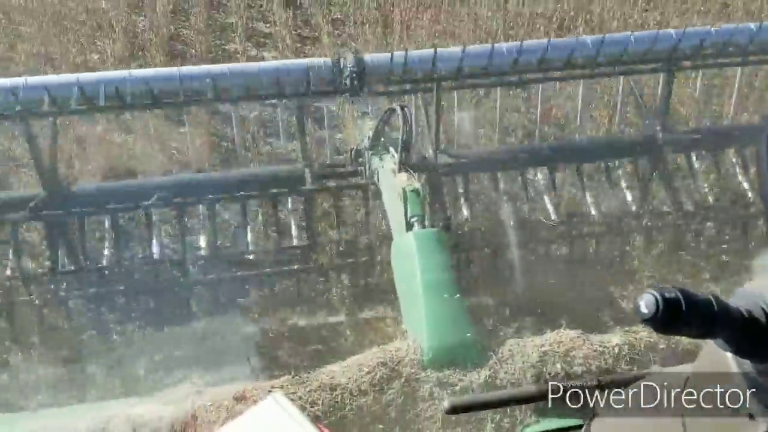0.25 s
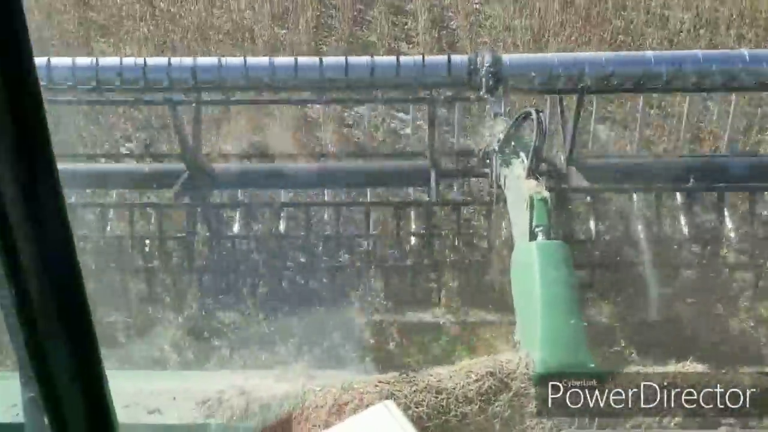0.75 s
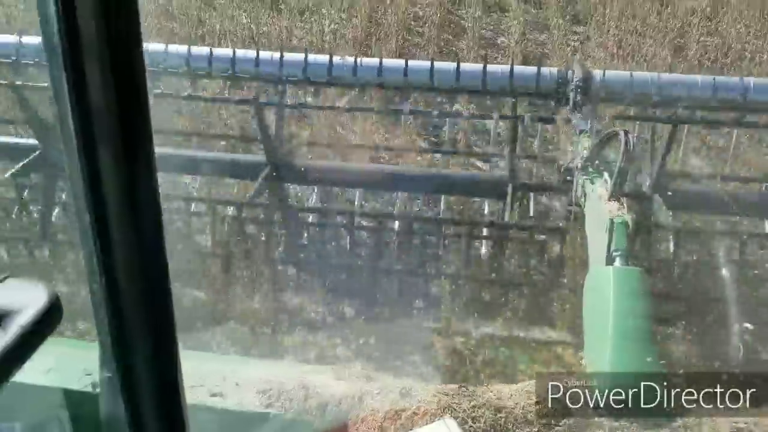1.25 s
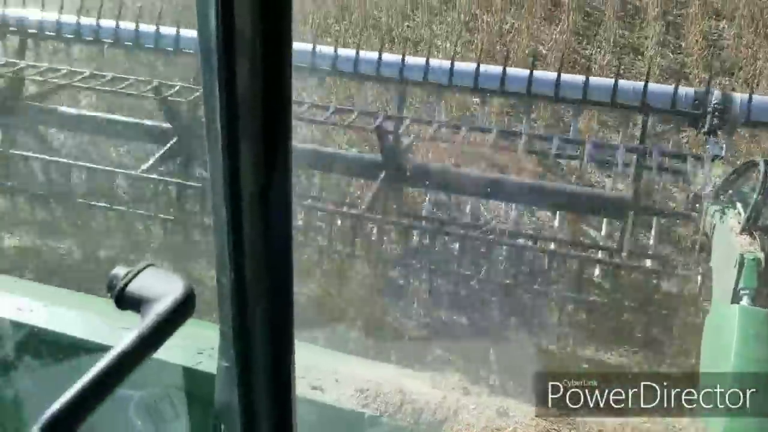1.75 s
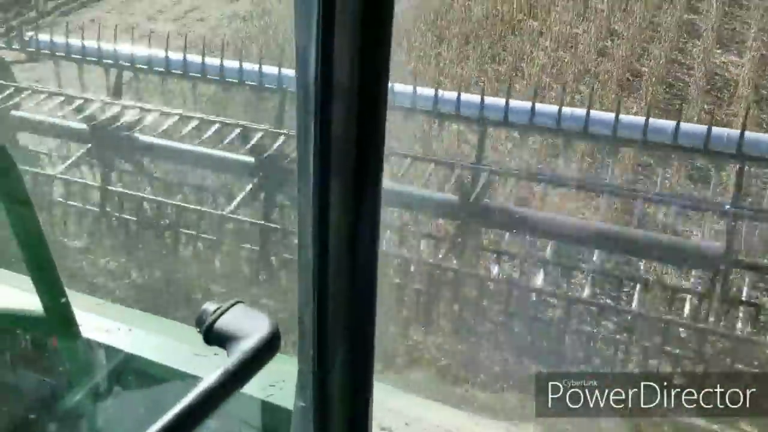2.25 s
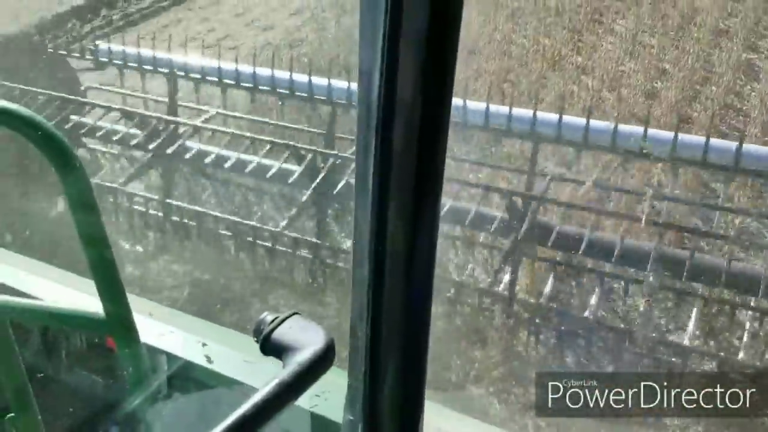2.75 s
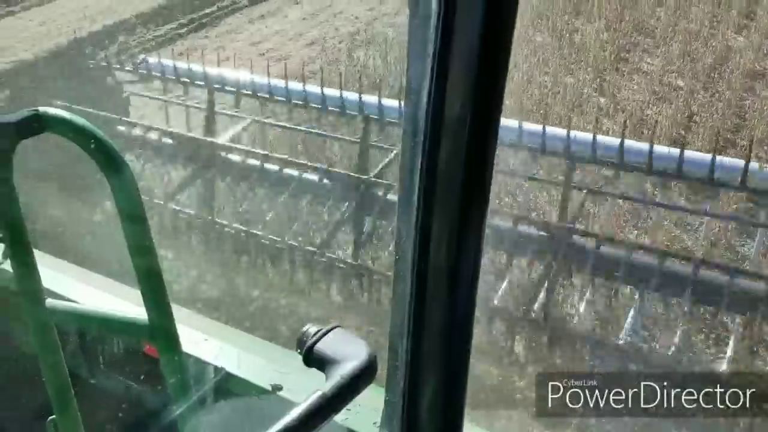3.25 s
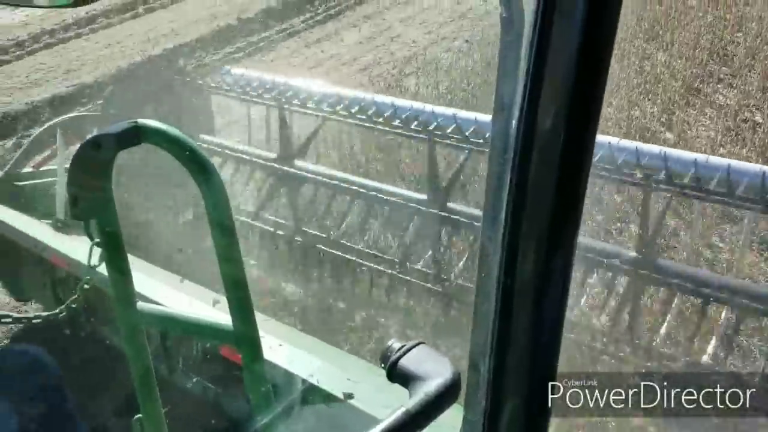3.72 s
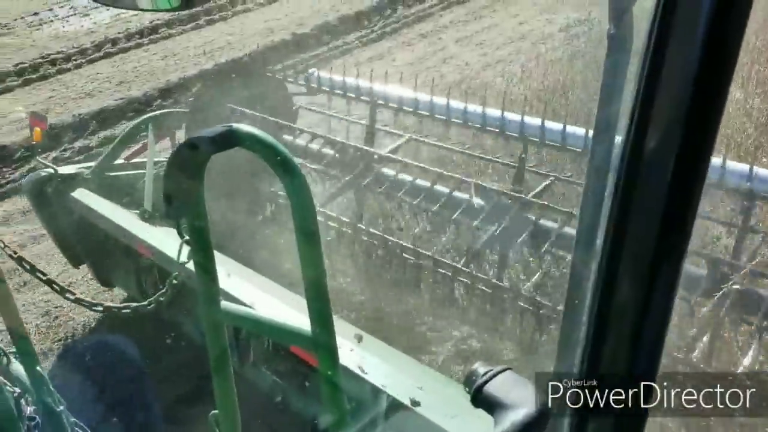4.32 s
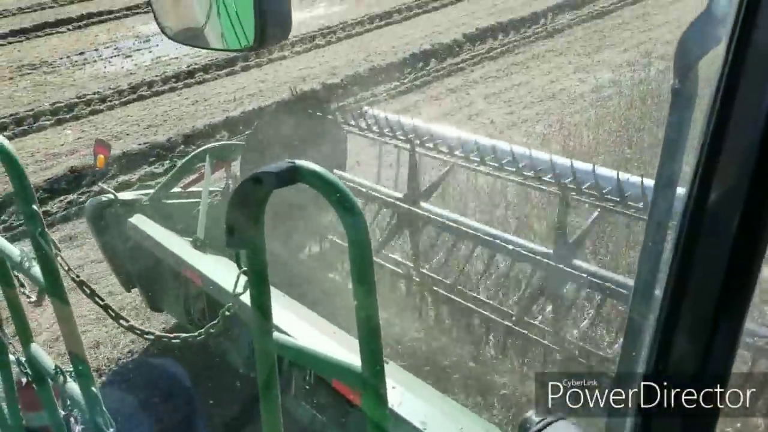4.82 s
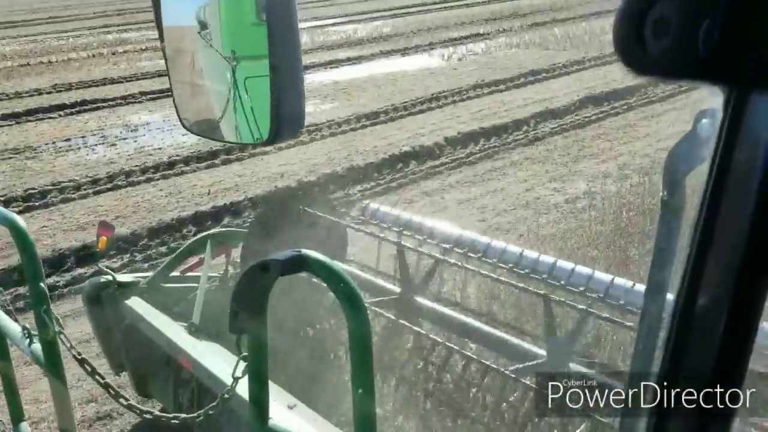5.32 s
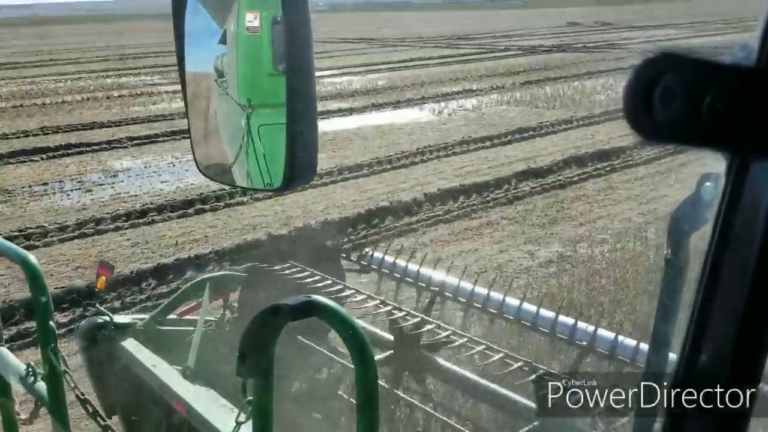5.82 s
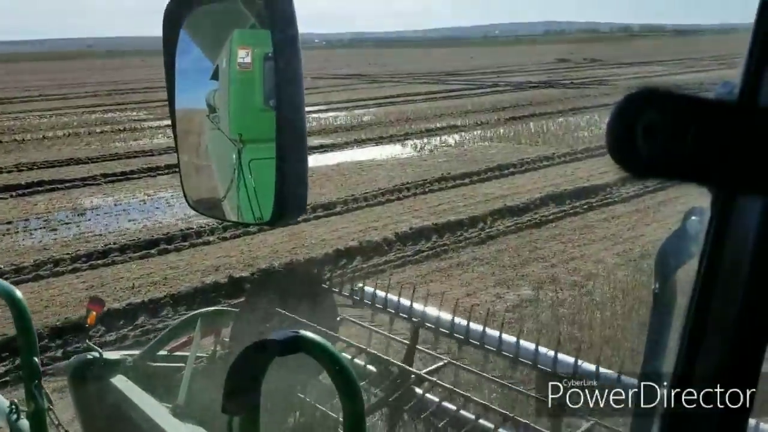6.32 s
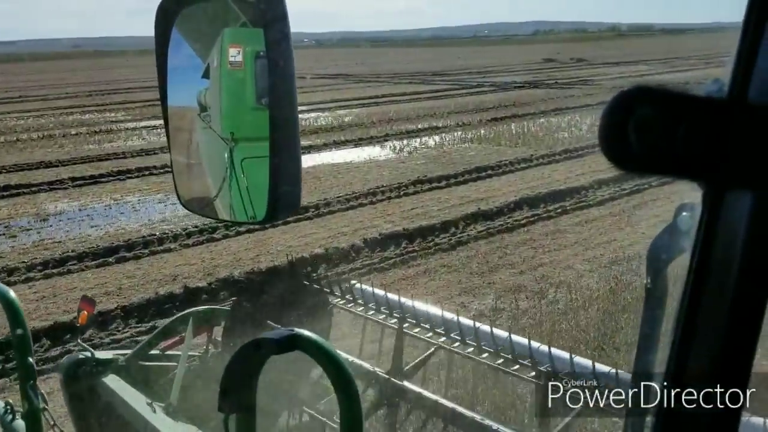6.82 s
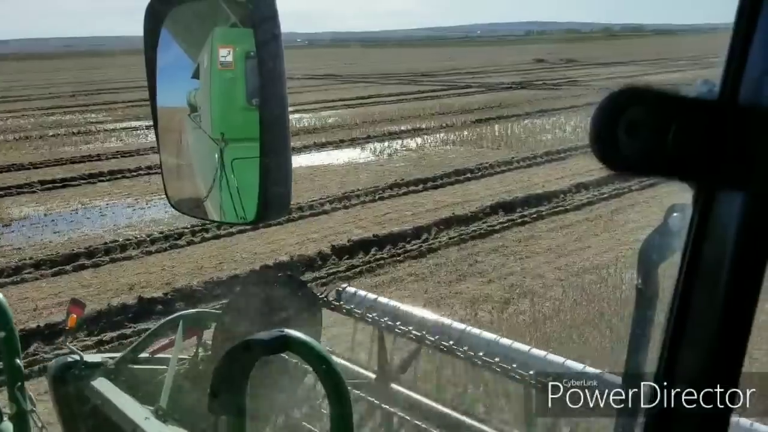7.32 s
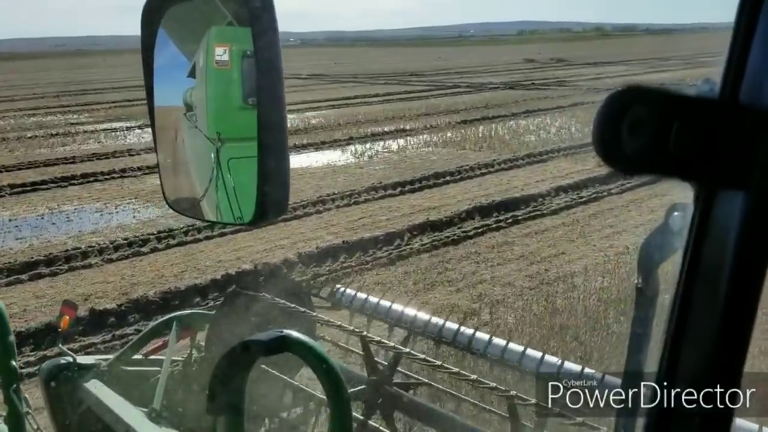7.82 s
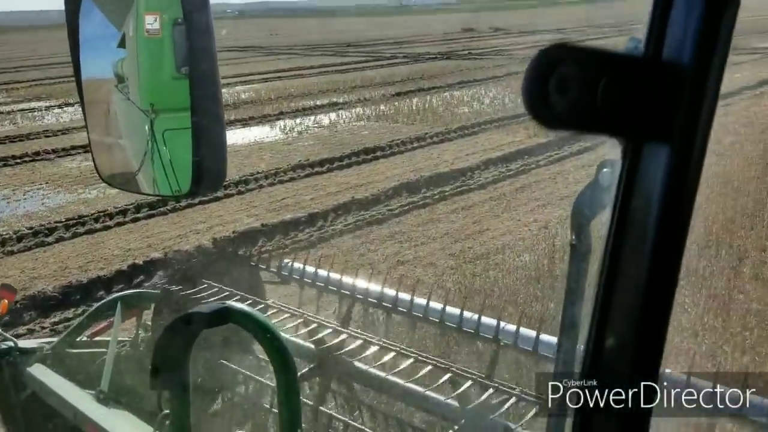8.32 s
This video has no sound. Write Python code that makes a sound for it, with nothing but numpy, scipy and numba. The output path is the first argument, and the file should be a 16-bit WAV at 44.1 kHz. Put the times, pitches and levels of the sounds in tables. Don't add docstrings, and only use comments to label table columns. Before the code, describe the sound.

Inside a combine harvester cab in a dry field, a dense low roar runs without pause, hull booming and shafts humming. Lumps of crop thud irregularly through the drums while sheet metal rings and loose parts knock lightly. A pod snaps early on and a dry bearing squeaks faintly. The handheld phone turns from windscreen to side door, the upper rumble growing and the panel ringing easing, with soft wind buffeting.

```python
import sys
import numpy as np
from scipy import signal
from scipy.fft import rfft, irfft, next_fast_len
from scipy.io import wavfile
from scipy.ndimage import uniform_filter1d, map_coordinates
from numba import njit

SR = 44100
rng = np.random.default_rng(int(sys.argv[2]) if len(sys.argv) > 2 else 0)


def dump(signal):
    limited = np.clip(np.atleast_2d(signal).T, -1, 1)
    pcm = np.round(limited * 32767).astype(np.int16)
    wavfile.write(sys.argv[1], SR, pcm)


def invert_db(x):
    u = np.asarray(x, float) / 20
    return 10 ** u


N = 377496

# time in seconds, angle to the left in degrees.
PHONE_TURN = [
    (0, -19),
    (.6, -8.5),
    (1.5, 17),
    (3, 38.5),
    (4.5, 56.5),
    (5.5, 72),
    (6.2, 74),
    (7.6, 78),
    (8.56, 63),
]
# start and end in seconds, left and right bass cut in Hz, level dip in dB.
GUSTS = [(0, 0.048, 136, 61, 1.8), (0.47, 0.606, 167, 50, -1), (0.615, 0.752, 188, 40, 0),
         (0.848, 0.913, 130, 59.5, -0.3), (1.218, 1.26, 150, 29.8, 0.5), (2.098, 2.13, 90, 91.4, 1),
         (2.87, 2.94, 128, 81.6, 0.1), (5.533, 5.665, 285, 77, 2), (5.75, 5.879, 184, 40, 3),
         (6.028, 6.265, 195, 69.6, 2), (6.306, 6.462, 146, 40, 2.5), (6.853, 6.94, 240, 50, 1.5),
         (7.129, 7.193, 240, 160, 2), (7.29, 7.395, 172, 40, 1), (7.499, 7.553, 201, 60, 2),
         (7.84, 7.865, 120, 30, -11), (8.036, 8.066, 140, 50, 1.2), (8.17, 8.206, 130, 30, 1.6),
         (8.29, 8.323, 130, 40, 1.5)]
# time in seconds, level in dB.
DRAUGHT_LEVEL = [(0.0, -25), (0.21, -35), (.6, -33), (1.3, -38), (2.1, -30.5), (2.8, -42), (3.41, -32),
                 (4.17, -34), (4.69, -36.5), (5.03, -36.5), (5.68, -31.5), (5.82, -32), (5.91, -27),
                 (6.03, -34), (7.2, -33), (7.32, -34), (8.56, -29.5)]
# frequency in Hz, level in dB per Hz.
DRAUGHT_COLOUR = [(14, -24), (25, -23), (42, -7.5), (55, -14), (90, -14)]

# frequency in Hz, likeness from 0 to 1.
PORT_LIKENESS = [(30, .55), (90, .9), (200, .97), (330, .72), (600, .7), (950, .86), (1400, .5), (2100, .8),
                 (4000, .42), (8000, .2), (14000, .33)]
# frequency in Hz, left minus right in dB.
PORT_BALANCE = [(30, 3), (90, .3), (220, .4), (310, 3.8), (450, -.2), (930, -1.5), (1300, .8), (2200, 1.5),
                (5000, .6), (12000, -1.3)]
# extra path in milliseconds, level in dB.
REFLECTIONS = [(2.3, -14), (3.9, -13), (6.1, -12), (9.7, -11), (14.3, -11)]
FACING = {"deep": (-28, 22, 1), "upper": (-26.5, 81, 2.2), "frame": (-34.5, 29, 0.94),
          "chaff": (-52, 52, 0.43), "dust": (-60, 39, 0.73), "panels": [(-39.5, 10, 3.5), (-42, 33, 26),
          (-47.5, 5, 12), (-52, 17, 1), (-47.5, 43, 15)]}

# frequency in Hz, level in dB per Hz.
SNAP_COLOUR = [(1000, 3), (2000, 7), (2700, 1), (3950, -2.5), (6490, -5), (8880, -11), (12300, -1),
               (15000, -5)]
# pitch in Hz, then bursts of start and length in seconds, level in dB.
SQUEALS = [
    (4450, [(.72, 0.041, -63), (.92, 0.064, -66)]),
    (4600, [(.53, .03, -60), (1.45, .06, -67), (2.4, 0.073, -73), (3.05, 0.079, -66), (3.4, .04, -63), (7.1, .04, -64)]),
]
# time in seconds, peak level in dB, ring in Hz.
KNOCKS = [(0.039, -20.5, 953), (0.125, -24, 950), (0.462, -23.5, 937), (0.835, -20, 960), (0.9, -24, 850),
          (1.173, -22, 920), (1.908, -18, 926), (2.08, -20.5, 880), (2.231, -25, 990), (2.436, -21, 953),
          (3.144, -21, 950), (3.385, -22, 954), (4.311, -22, 955), (5.996, -19.5, 950), (7.223, -28, 969),
          (7.78, -22, 840)]
# time in seconds, peak level in dB, ring in Hz.
TICKS = [(0.1196, -35, 2040), (0.599, -31, 1870), (1.8078, -36, 2010), (1.9475, -31, 1800),
         (2.1405, -33, 1850), (4.9352, -39, 2170), (5.3308, -27, 2090), (5.5159, -35, 2120),
         (6.137, -28, 1880), (7.0688, -35, 2060), (7.1442, -37, 1910), (7.5038, -42, 2250),
         (8.0496, -27, 1850), (8.2666, -28, 1990), (0.4115, -34, 1750), (0.6469, -43, 1990),
         (0.8714, -30, 2010), (0.9009, -36, 2060), (1.4491, -32, 2060), (1.6262, -36, 2190),
         (3.7718, -36, 1770), (4.9801, -33, 2380), (5.1986, -24, 2100), (5.2894, -35, 2110),
         (5.5528, -40, 2080), (7.7134, -37, 2240), (7.7742, -34, 2050), (7.9289, -31, 2160),
         (8.0072, -37, 2090)]
# time in seconds, peak level in dB, ring in Hz.
FLECKS = [
    (1.296, -46, 4700),
    (1.315, -44, 4800),
    (1.338, -46, 2900),
    (4.714, -45, 4500),
]

# frequency in Hz, level in dB per Hz.
DUST_COLOUR = [(7800, -11), (8700, -11.5), (10000, -6.5), (12300, -0.5), (14000, -3.5), (15100, -6)]
# frequency in Hz, level in dB per Hz.
CHAFF_COLOUR = [(1000, -36), (1400, -12), (2400, -10), (3100, -8), (4300, -7), (5200, -8.5), (6800, -16),
                (7600, -23), (8500, -56), (9500, -47)]
# frequency in Hz, width in Hz, lift in dB.
CHAFF_MODES = [(2800, 220, -6.5), (3570, 610, 5), (4500, 160, 4), (6380, 760, 4)]
# time and length in seconds, chaff lift and tine lift in dB.
SWATH = [(.3, 0.27, 2.3, 3), (1.3, 0.094, 1.5, 1.5), (2.15, .2, 0, 1), (3.4, 0.41, -3.9, -5.5),
         (5.3, .2, 1, 0.5), (5.58, 0.034, 1.5, 0), (6.15, 0.15, -1.5, -3.5), (8.1, 0.36, 0, -0.5),
         (3.5, 0.28, 2, 5.5), (4.88, 0.064, 0, 2), (5.9, 0.043, 1, 2), (7.1, 0.12, -2, 0.5),
         (.05, .08, -2, -1), (.45, .1, -1.5, -2), (.73, .1, -0.5, 1), (1.05, .1, -0.5, 0)]
# frequency in Hz, width in Hz, level in dB.
PANEL_MODES = [
    [(946, 72, 0), (995, 50, -14)],
    [(852, 64, 0)],
    [(1070, 85, 0), (1190, 80, -8), (1310, 120, -21)],
    [(1540, 160, -12), (1790, 230, 0), (1970, 200, 0), (2900, 260, -9)],
    [(2085, 200, 1), (2270, 170, -5.5), (2420, 200, -7), (2620, 260, -10)],
]
# time and length in seconds, frame lift and panel lift in dB.
JOLTS = [(.15, 0.13, 1.5, 0.5), (.55, 0.082, 1.5, 1.5), (1.0, 0.24, 2, -0.5), (1.25, 0.04, -0.5, -1.5),
         (1.5, 0.057, -1, 0), (2.0, 0.13, 1, 0), (2.3, 0.016, -3, -6), (2.93, 0.1, -0.5, -3.5),
         (3.15, 0.18, 1, 0.5), (3.8, 0.31, 0, -0.5), (4.4, 0.17, 0, -1.5), (4.65, 0.079, 1.5, -1.5),
         (5.6, 0.043, 1, 0.5), (5.85, 0.11, 1.5, 5.5), (6.1, 0.023, -8, -7), (6.35, 0.3, 2.5, 1.5),
         (6.85, .15, -0.5, 1), (7.25, 0.061, -0.5, 2), (7.7, 0.07, 0.5, 3), (8.4, .12, 1.5, -0.5)]
# frequency in Hz, level in dB per Hz.
FRAME_COLOUR = [(250, -0.5), (280, 3.5), (400, 2.5), (480, -0.5), (530, -5), (700, -8.5), (770, -19),
                (900, -26), (1300, -26.5), (1700, -19)]
# frequency in Hz, width in Hz, lift in dB.
FRAME_MODES = [(355, 40, 3), (575, 30, 3), (683, 30, 5)]

SHAFT_HZ = [68, 92, 97.5, 126, 132, 157.6, 255.6, 356, 426.5, 443, 491, 571.5, 1904]
# level in dB, speed wander in percent, left minus right in dB.
SHAFT_LEVELS = [(-41, .15, -2), (-39, 1.2, 0), (-41, .5, -.5), (-39, .6, 0), (-39, .6, 0), (-39, .2, -1.5),
                (-39.5, .3, 2), (-50, .3, -1), (-50, .12, -2), (-52, .06, -2), (-54, .1, -2),
                (-51, .22, -3), (-61, .1, 1)]
# frequency in Hz, level in dB per Hz.
HULL_COLOUR = [(40, -28), (52, -12), (68, 2.5), (110, -6), (180, -8), (255, -6), (285, -53)]
# frequency in Hz, width in Hz, lift in dB.
HULL_MODES = [(92.5, 10.7, 11.5), (130, 77, 10), (195, 5.1, 7.5), (240, 14, -4.5)]
# time and length in seconds, lift in dB.
SIEVE = [(.12, .05, 6), (.24, .04, -1), (.55, 0.041, 4.5), (.77, 0.096, 8.5), (1.3, 0.17, 3.5),
         (1.43, .02, -12), (1.48, .025, 4.5), (1.66, .05, 13), (1.86, 0.055, -10), (2.26, 0.043, -5),
         (2.57, 0.033, 4), (2.72, 0.061, -1.5), (2.94, 0.046, -2), (3.4, 0.059, -8), (3.6, 0.11, 7.5),
         (4.14, .05, 1), (4.6, 0.066, -2), (5.2, 0.12, 3.5), (5.5, 0.087, 6), (5.6, 0.027, -13),
         (5.7, .05, 0), (6.7, 0.063, 6), (6.87, 0.045, -4), (7.26, 0.046, 0), (8.1, 0.077, -11)]
# time and length in seconds, deep boom lift and upper rumble lift in dB.
WADS = [(0.298, 0.075, 8.5, 0.5), (0.354, 0.027, -1, 6.5), (0.655, 0.025, 6, -6), (0.946, 0.015, 14, 1),
        (1.35, 0.089, 10.5, 1.5), (1.624, 0.029, -19, -5), (1.776, 0.031, -11, 2.5), (1.89, 0.035, 9.5, 3),
        (2.127, 0.051, -16, 4.5), (2.225, 0.079, 2, 5), (2.36, 0.049, -7, 4.5), (2.58, 0.034, 6, 2),
        (2.653, 0.029, -7, -1), (2.78, 0.088, 4, 5), (2.92, 0.026, -9, -2), (3.074, 0.049, 11.5, -1),
        (3.304, 0.065, 7.5, 2.5), (3.44, 0.036, -3, 9), (3.634, 0.043, 3, -8), (3.741, 0.034, 5, 6.5),
        (4.33, 0.044, -13, 4), (4.544, 0.027, 9, 4), (4.63, 0.044, -10, 4), (5.145, 0.27, 3.5, 1.5),
        (5.39, 0.024, 9.5, 2.5), (5.91, 0.072, 4, 0.5), (6.48, 0.053, 9, 4), (7.103, 0.082, 8, 4),
        (7.17, 0.017, -14, -21), (8.093, 0.024, -14, 9.5), (0.052, 0.046, -1, -3), (0.436, 0.035, -1, 1),
        (1.05, 0.084, -3, -4.5), (1.495, 0.032, 2, 2), (2.065, 0.026, -4, -2), (3.0, .05, 1.5, 3),
        (3.903, 0.068, 0, 1.5), (4.13, 0.089, 4, -2), (4.253, 0.027, -4, 4.5), (4.75, 0.046, 1, 2),
        (5.59, 0.033, 12.5, 0.5), (5.7, 0.044, 3.5, 3.5), (5.828, 0.033, -1, 6.5), (6.058, 0.044, 4, 3.5),
        (6.327, 0.027, -2, 0), (6.885, 0.047, 9, 0), (7.254, 0.079, -5, 4), (7.597, 0.049, -16, -1.5),
        (7.97, 0.081, -20, 0), (8.397, 0.073, 3, 0.5)]
# time in seconds, lift in dB.
THUDS = [(0.36, -1), (0.588, 2), (0.669, 9), (0.836, 5), (0.958, 4.6), (1.131, 4), (1.371, 0), (1.478, 6),
         (1.696, 3), (1.78, 7.5), (1.895, 3), (1.931, 7), (2.221, 7.5), (2.257, 10), (2.593, 6), (2.703, 9),
         (2.783, 2), (2.859, 4.5), (3.085, 3.5), (3.412, 6), (3.743, 1), (3.983, 7), (4.054, 10.5),
         (4.108, 10), (4.169, 6), (4.341, 9), (4.394, 6), (4.424, 3.6), (4.536, 8), (4.658, 7), (4.71, 7),
         (4.806, 6), (4.84, 6), (5.154, 6.5), (5.222, 4), (5.359, 7.5), (5.688, 6.5), (5.723, -3),
         (5.893, 6), (5.94, 3), (6.006, 3), (6.129, 3), (6.335, 9), (6.496, 7), (6.6, 9), (6.791, 1.5),
         (7.067, 4.4), (7.205, 5), (7.238, 8), (7.42, -3), (7.489, 6), (7.611, 9), (7.794, 7), (7.901, 6),
         (8.017, 7), (8.092, 4), (8.156, 6), (8.241, 6.5), (8.272, 5.3), (8.465, 5.3)]

PORT_LAG = 17.97
GUARD_EDGE_S, GUARD_RELEASE_S, GUARD_LINGER_S = 0.0096, 0.38, 0.39
FADE_IN_S = 0.012
TOP_HZ, TOP_ORDER = 15550, 90
SNAP_S, SNAP_DB, SNAP_T60_S = .593, -30.5, .045
SNAP_TAIL_DB, SNAP_TAIL_T60_S = -17, 0.11
SQUEAL_WIDTH_HZ = 43
KNOCK_RISE_S, KNOCK_CYCLES, KNOCK_TRIM_DB = .0008, 42, -1.5
HUSH_S, HUSH_DB = .012, -5
THROB_DB, THROB_PER_S = 2.9, 26
THUD_S, THUD_STEADY = 0.0048, 0.29
SHAKE = 0.55

T = np.arange(N) / SR
SIZE = next_fast_len(N)
HZ = np.maximum(np.fft.rfftfreq(SIZE, 1 / SR), 1)


def unit(x):
    return x / np.sqrt(np.mean(x ** 2))


def over_time(table):
    s, value = np.transpose(table)
    return np.interp(T, s, value)


def over_hz(points):
    hz, value = np.transpose(points)
    return np.interp(np.log(HZ), np.log(hz), value)


def closed(points, slope_db):
    octaves_below = np.maximum(np.log2(points[0][0] / HZ), 0)
    octaves_above = np.maximum(np.log2(HZ / points[-1][0]), 0)
    return invert_db(over_hz(points) - slope_db * (octaves_below + octaves_above))


def bell(hz, width_hz):
    return 1 / (1 + (2 * (HZ - hz) / width_hz) ** 2)


def lifted(points, modes, slope_db):
    lift_db = sum(db * bell(hz, width) for hz, width, db in modes)
    return closed(points, slope_db) * invert_db(lift_db)


def shape(x, gain):
    return irfft(rfft(x, SIZE) * gain, SIZE)[..., :N]


def walk(rate):
    hold = int(SR / rate)
    steps = np.repeat(rng.standard_normal(N // hold + 1), hold)
    smooth = uniform_filter1d(uniform_filter1d(steps, hold), hold)
    return unit(smooth[:N])


def delayed(x, samples):
    return map_coordinates(x, [np.arange(N) - samples], order=3, mode="nearest")


def port_lag():
    return PORT_LAG * np.sin(np.radians(over_time(PHONE_TURN)))


def facing_db(level_db, toward_deg, loss_db):
    off_axis = np.radians(over_time(PHONE_TURN) - toward_deg)
    return level_db - loss_db * (1 - np.cos(off_axis))


def swells(table):
    lift = np.zeros((len(table[0]) - 2, N))
    for s, length, *lift_db in table:
        near = slice(max(int((s - 3 * length) * SR), 0), int((s + 3 * length) * SR))
        lift[:, near] += np.outer(lift_db, np.exp(-((T[near] - s) / length) ** 2))
    return lift


def thuds():
    return swells([(s, THUD_S, db) for s, db in THUDS])[0]


def load():
    gaps = np.clip(walk(THROB_PER_S), 0, 1.6) ** 2
    return np.outer([1, .9], -THROB_DB * gaps) + swells(WADS)


def hush(events):
    return swells([(s - HUSH_S / 2, HUSH_S, HUSH_DB) for s, *_ in events])[0]


def steadied(x, length, even):
    swell = uniform_filter1d(np.mean(x ** 2, axis=0), size=length)
    return unit(x / (swell + .05) ** (even / 2))


def draught():
    eddies = 0.6 * rng.standard_normal(N) + 0.8 * rng.standard_normal((2, N))
    level_db = over_time(DRAUGHT_LEVEL) + 5.0 + 1.6 * walk(6.1) + SHAKE * thuds()
    return unit(shape(eddies, closed(DRAUGHT_COLOUR, 8.7))) * invert_db(level_db)


def roar():
    likeness = np.clip(over_hz(PORT_LIKENESS), 0, 1)
    source = rng.standard_normal(N)
    lag = port_lag()
    middle = np.array([delayed(source, 0.5 * lag), source])
    treble = np.array([delayed(source, lag), source])
    for ms, db in REFLECTIONS:
        path = ms * SR / 1000 * (1 + 0.0304 * walk(.8))
        left = delayed(source, path + lag)
        right = delayed(source, path + 6 * walk(0.462))
        treble = treble + invert_db(db) * np.array([left, right])
    high = 1 / (1 + (1300 / HZ) ** 8)
    low = 1 / (1 + (HZ / 300) ** 4)
    direct = shape(source, low) + shape(middle, 1 - low - high) + shape(unit(treble), high)
    own = rng.standard_normal((2, N))
    both = shape(direct, np.sqrt(likeness)) + shape(own, np.sqrt(1 - likeness))
    return shape(both, invert_db(np.outer([.5, -.5], over_hz(PORT_BALANCE))))


def snap():
    since = np.maximum(T - SNAP_S, 0)
    tearing = invert_db(-60 * np.maximum(since - .006, 0) / SNAP_T60_S)
    rustle = invert_db(SNAP_TAIL_DB - 60 * since / SNAP_TAIL_T60_S)
    burst = (1 - np.exp(-since / 0.0003)) * (tearing + rustle)
    crack = 0.59 * rng.standard_normal(N) + 2.0 * rng.standard_normal((2, N))
    return unit(shape(crack, closed(SNAP_COLOUR, 30))) * burst * invert_db(SNAP_DB)


def squeals(air):
    out = 0
    for hz, bursts in SQUEALS:
        whistle = unit(shape(air, bell(hz, SQUEAL_WIDTH_HZ)))
        level = sum(invert_db(db) * np.exp(-((T - s) / length) ** 2) for s, length, db in bursts)
        out = out + whistle * level
    return out


def knocks():
    ring = np.zeros(N)
    for s, db, hz in [*KNOCKS, *TICKS, *FLECKS]:
        start = int(s * SR)
        since = np.maximum(T[start:int((s + .12) * SR)] - s, 0)
        decay = invert_db(db + KNOCK_TRIM_DB - 60 * since * hz / KNOCK_CYCLES)
        rise = 1 - np.exp(-since / KNOCK_RISE_S)
        ring[start:start + len(since)] += decay * rise * np.sin(2 * np.pi * hz * since)
    return np.array([delayed(ring, 0.29 * port_lag()), ring])


def chaff(air, chaff_db, dust_db):
    puffs_db = 0.34 * walk(15) + 0.85 * walk(30)
    coarse = unit(shape(air, lifted(CHAFF_COLOUR, CHAFF_MODES, 30))) * invert_db(chaff_db + puffs_db)
    flicker_db = 0.57 * walk(12) + 0.17 * puffs_db
    return coarse + unit(shape(air, closed(DUST_COLOUR, 30))) * invert_db(dust_db + flicker_db)


def panels(air, panel_jolt_db, tine_db):
    out = 0
    for i, (modes, facing) in enumerate(zip(PANEL_MODES, FACING["panels"])):
        if i < 3:
            change_db = panel_jolt_db + hush(KNOCKS) - .4
        else:
            change_db = tine_db + 0.13 * hush(TICKS)
        ring = unit(shape(air, sum(invert_db(db) * bell(hz, width) for hz, width, db in modes)))
        flutter_db = 0.9 * walk(20) + 1.9 * walk(45)
        out = out + steadied(ring, 4000, 0.25) * invert_db(facing_db(*facing) + change_db + flutter_db)
    return out


def frame(air, upper_swing_db, jolt_db):
    level_db = facing_db(*FACING["frame"]) + 0.29 * upper_swing_db + jolt_db
    level_db = level_db + 1.43 * walk(14) + 0.28 * SHAKE * thuds()
    return unit(shape(air, lifted(FRAME_COLOUR, FRAME_MODES, 32.0))) * invert_db(level_db)


def shafts(deep_db, upper_db, panel_facing_db):
    out = 0
    for hz, (db, wander, pan_db) in zip(SHAFT_HZ, SHAFT_LEVELS):
        if hz < 110:
            follow_db = .8 * deep_db
        elif hz < 300:
            follow_db = .5 * upper_db
        else:
            follow_db = .3 * panel_facing_db
        phase = 2 * np.pi * np.cumsum(hz * (1 + wander / 100 * walk(2.5))) / SR
        tone = np.sqrt(2) * np.sin(phase) * invert_db(db + 1.1 * walk(3.2) + follow_db)
        out = out + invert_db(np.array([[.5], [-.5]]) * pan_db) * tone
    return out


def hull(air, deep_db, upper_db):
    boom = lifted(HULL_COLOUR, HULL_MODES, 24)
    deep = 1 / (1 + (HZ / 125) ** 8)
    floor = 1 / (1 + (HZ / 60) ** 10)
    sieve = 1 / (1 + (215 / HZ) ** 12)
    mean_db = np.mean(deep_db)
    bands = [(floor, mean_db - 13.5 + .5 * (deep_db - mean_db)),
             (deep - floor, deep_db - 0.1),
             (1 - deep - sieve, upper_db - .4),
             (sieve, upper_db - 8.0 + swells(SIEVE)[0])]
    out = 0
    for share, level_db in bands:
        part = unit(shape(air, boom * share))
        out = out + steadied(part, 3500, 0.4) * invert_db(level_db)
    return out


def drum(rumble):
    power = np.mean(rumble ** 2, axis=0)
    chance = uniform_filter1d(power, size=500) / uniform_filter1d(power, size=9000)
    return rumble / (chance + 0.19) ** (THUD_STEADY / 2) * invert_db(thuds() - 1.0)


def scene():
    air = roar()
    deep_swing_db, upper_swing_db = load()
    chaff_lift_db, tine_db = swells(SWATH)
    frame_jolt_db, panel_jolt_db = swells(JOLTS)
    main_panel_db = facing_db(*FACING["panels"][0])
    panel_facing_db = main_panel_db - np.mean(main_panel_db)

    hiss = chaff(air, facing_db(*FACING["chaff"]) + chaff_lift_db, facing_db(*FACING["dust"]))
    metal = panels(air, panel_jolt_db, tine_db) + frame(air, upper_swing_db, frame_jolt_db)
    hum = shafts(deep_swing_db + 3.0, upper_swing_db - .4, panel_facing_db)
    deep_db = facing_db(*FACING["deep"]) + deep_swing_db
    upper_db = facing_db(*FACING["upper"]) + upper_swing_db
    rumble = drum(hull(air, deep_db, upper_db) + hum)
    return snap() + squeals(air) + knocks() + hiss + metal + rumble


@njit
def high_pass(x, hz, damp):
    y, band, low_state = np.empty(len(x)), 0., 0.
    for i in range(len(x)):
        g = np.tan(np.pi * hz[i] / SR)
        v = (band + g * (x[i] - low_state)) / (1 + g * (g + damp))
        low = low_state + g * v
        band, low_state = 2 * v - band, 2 * low - low_state
        y[i] = x[i] - damp * v - low
    return y


def wind_guard(dry, wind):
    corner_hz, dip_db = np.full((2, N), 12.), np.zeros(N)
    for start, end, left_hz, right_hz, db in GUSTS:
        after = np.maximum(T - end, 0)
        rise = np.clip((T - start) / GUARD_EDGE_S + .5, 0, 1)
        hold = np.clip((end - T) / GUARD_EDGE_S + .5, 0, 1)
        strength = rise * (0.43 * hold + 0.15 * np.exp(-after / GUARD_LINGER_S))
        corner_hz = np.maximum(corner_hz, np.outer([left_hz, right_hz], strength))
        dip_db = np.maximum(dip_db, db * rise * np.exp(-after / GUARD_RELEASE_S))
    heard = dry + 0.68 * wind
    cut = np.array([high_pass(high_pass(x, hz, 2.16), hz, 1.0) for x, hz in zip(heard, corner_hz)])
    return (0.8 * cut + 0.17 * dry) * invert_db(-dip_db) + 0.34 * wind


def roll_off(x):
    return signal.sosfilt(signal.butter(12, 15500, fs=SR, output="sos"), x)


def record(dry):
    guarded = wind_guard(dry, draught())
    faded = guarded * np.clip(.5 + T / FADE_IN_S / 2, 0, 1)
    mix = shape(faded, 1 / (1 + (HZ / TOP_HZ) ** TOP_ORDER))
    return roll_off(mix)


dry = scene()
out = record(dry)
dump(out)
```